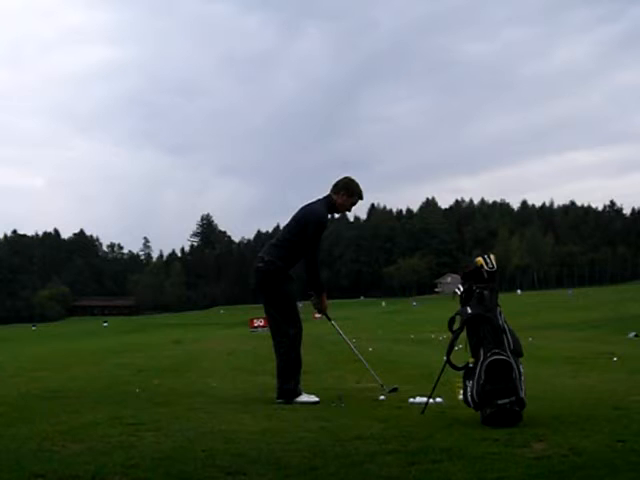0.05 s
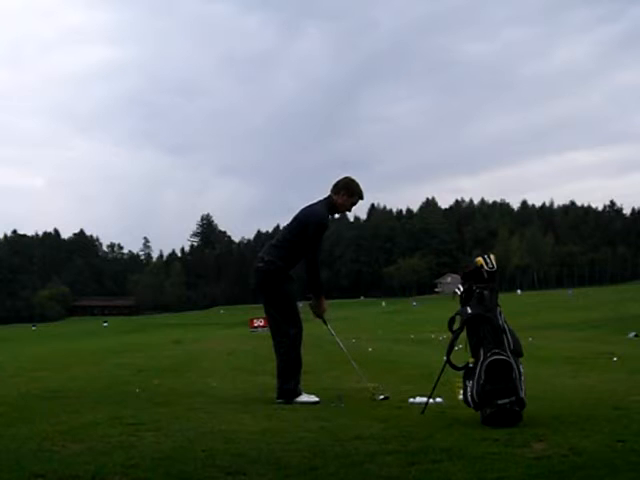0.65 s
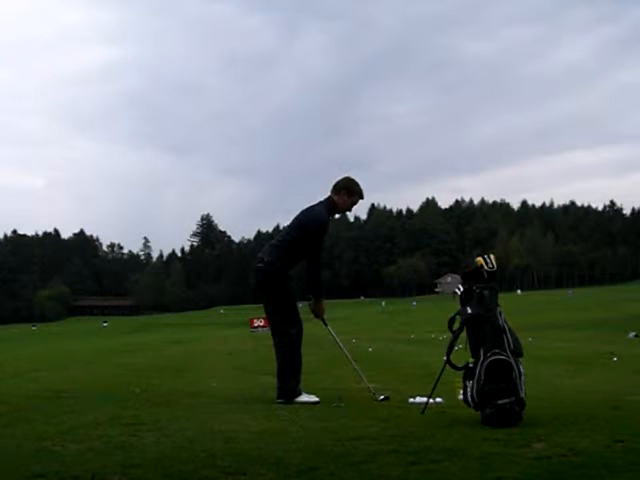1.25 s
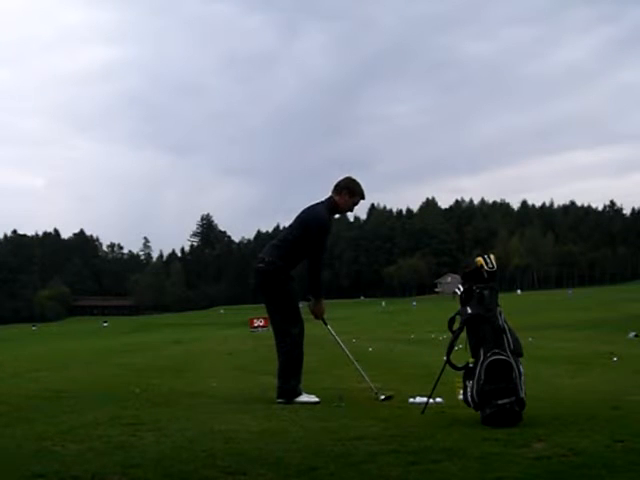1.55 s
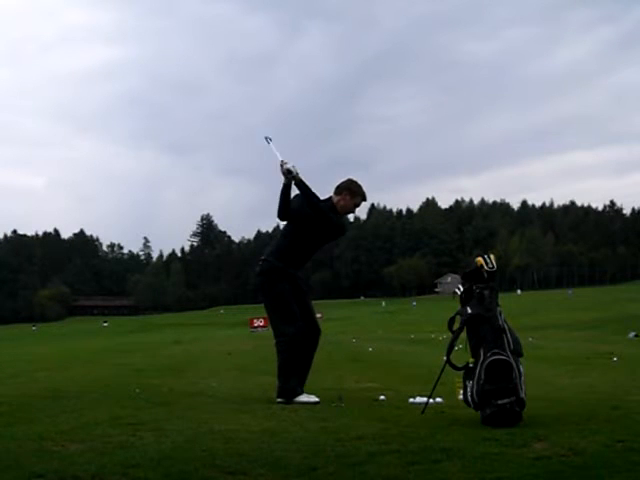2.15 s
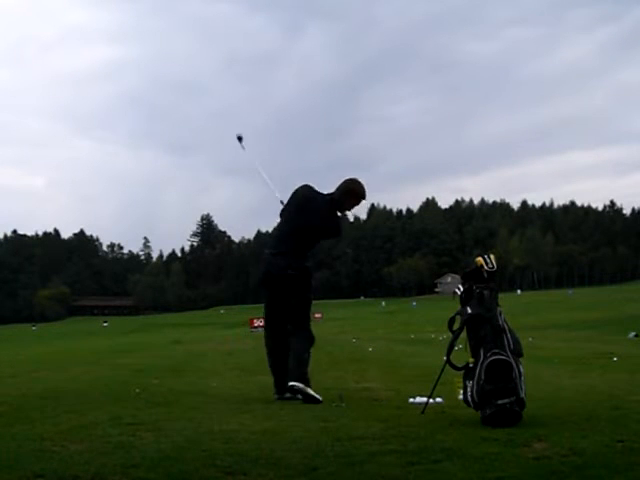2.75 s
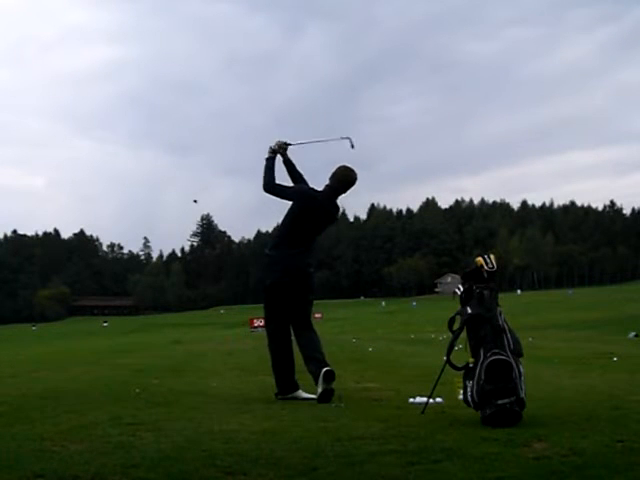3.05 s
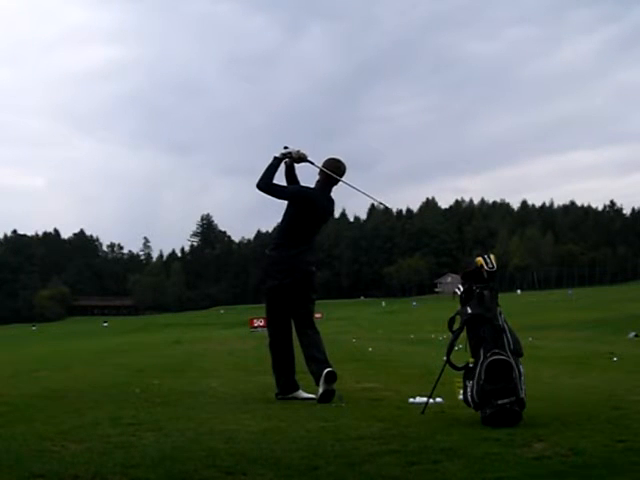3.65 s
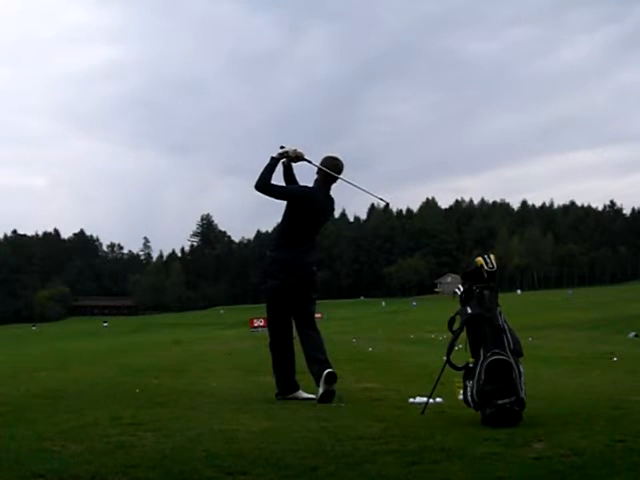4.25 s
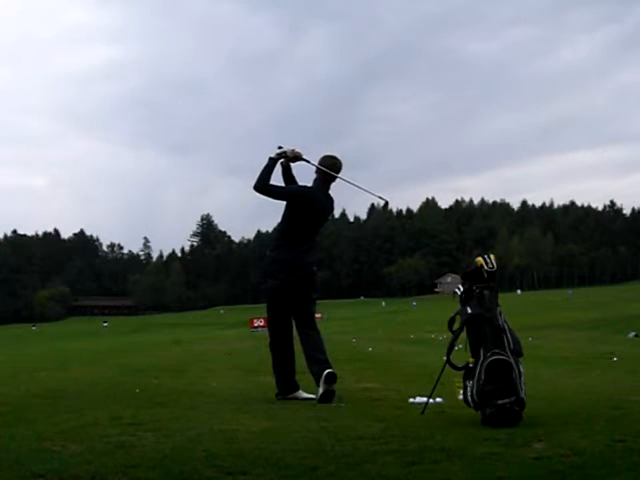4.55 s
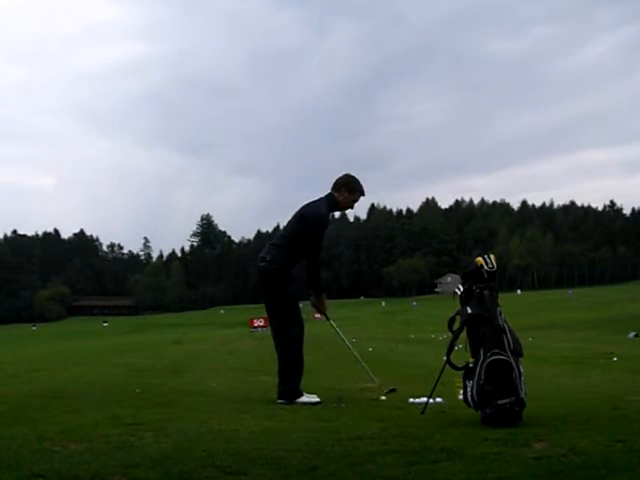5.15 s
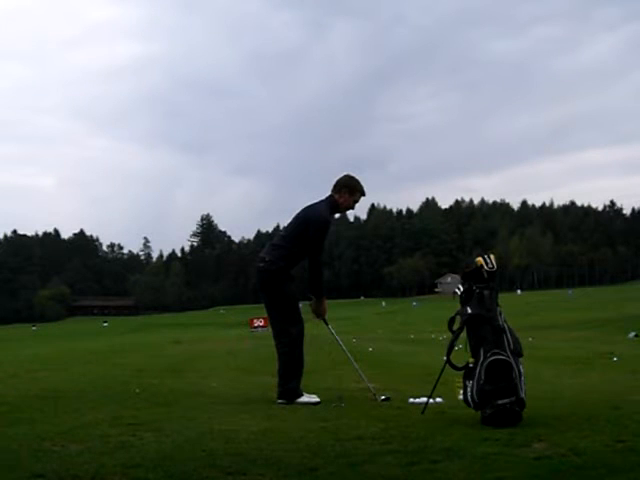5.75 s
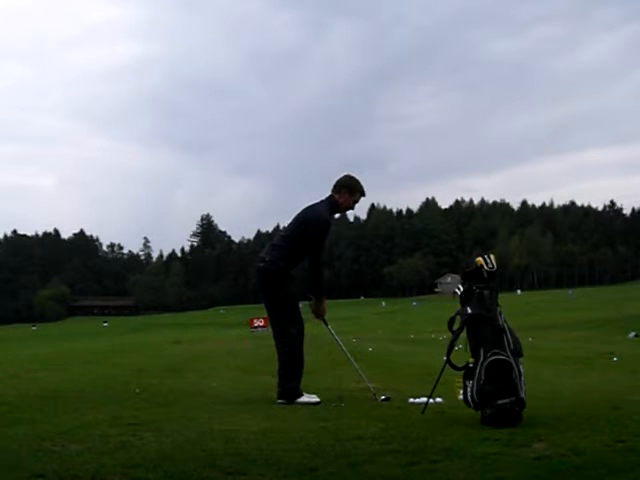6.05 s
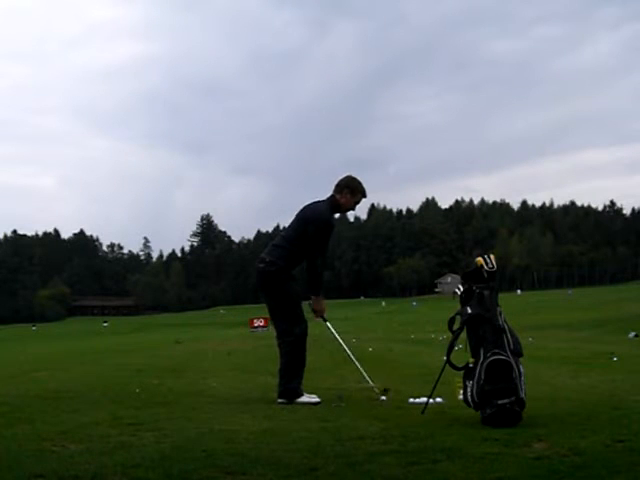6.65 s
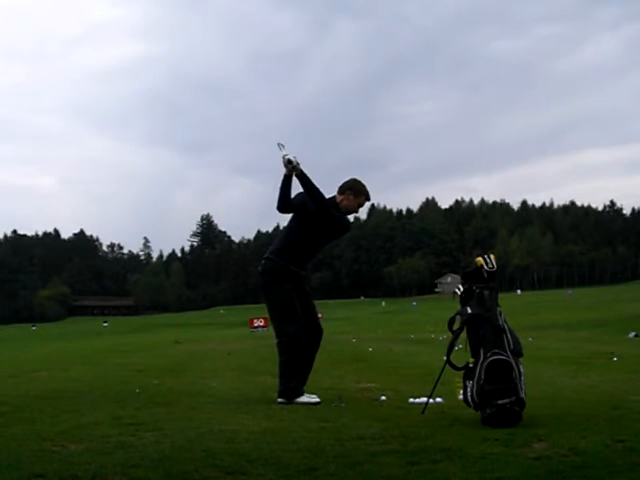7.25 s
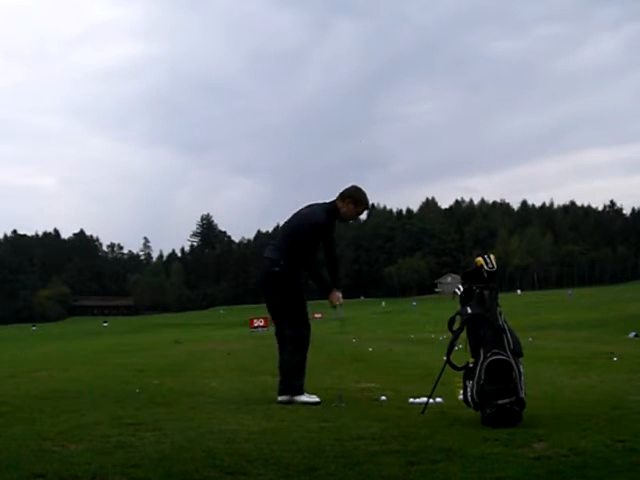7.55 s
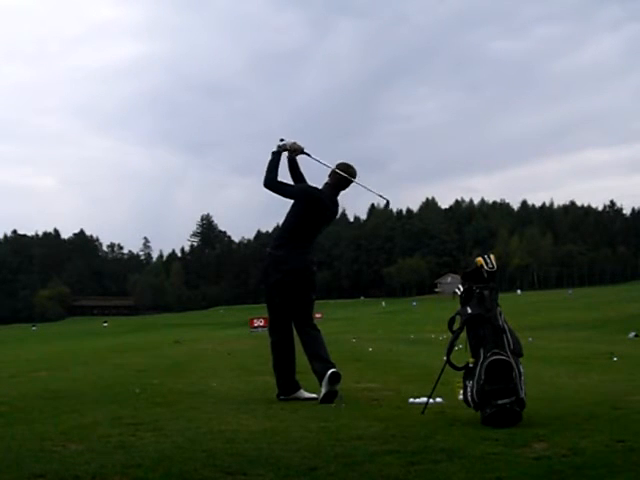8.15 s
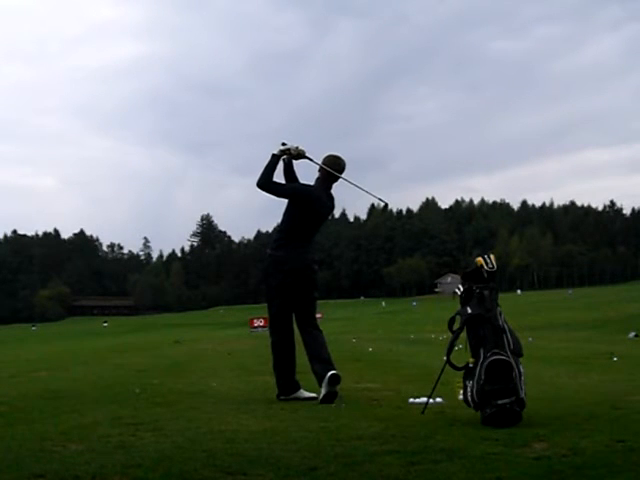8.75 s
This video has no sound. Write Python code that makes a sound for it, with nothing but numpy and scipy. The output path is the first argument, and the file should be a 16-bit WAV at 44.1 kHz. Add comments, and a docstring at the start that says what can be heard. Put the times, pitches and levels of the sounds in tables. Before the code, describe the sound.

Faint distant traffic rumbles beneath a soft hiss at a driving range. A few metres away, a golfer swings with a quick whoosh and strikes the ball, the hard crack scattering into brief echoes. Two light metallic clinks follow from further away. The rumble dies down, and after a pause a second, slightly louder shot cracks and echoes in the same way.

```python
"""On a driving range, two golf shots are hit a few metres away in the tee shelter.
Each time the club swishes through the air and cracks against the ball, and the shelter
scatters the crack into a wash of echoes. Another club clinks further off.
Distant traffic rumbles and fades under a steady hiss, a low hum and a few faint brushes and peeps."""
import sys
import numpy as np
from scipy import signal
from scipy.fft import rfft, irfft
from scipy.io import wavfile
from scipy.ndimage import uniform_filter1d

SR = 44100
rng = np.random.default_rng(int(sys.argv[2]) if len(sys.argv) > 2 else 0)


def persist_wave(psi):
    """Save psi, clipped to +-1, as 16-bit WAV."""
    counts = np.round(np.clip(psi, -1, 1) * 32767).astype(np.int16)
    wavfile.write(sys.argv[1], SR, np.atleast_2d(counts).T)


N = 396900

# one row a shot: t/s, knock/dB, crack/dB, turf thud/dB, echo/dB, swish/dB, whistle/dB,
# whistle lead/s, shaft tip/dB
SHOTS = [(2.6368, -4, -18, -26.5, -29, -44.5, -40, 0.0145, -53.5),
         (7.6542, -0.5, -18, -37, -28.5, -44.5, -35, 0.021, -57)]
# tones of club head and ball: f/Hz, level/dB, t60/s (the time to fade by 60 dB)
HEAD_TONES = [(370, -18, 0.024), (637, -9.5, 0.015), (797, -8.5, 0.0093), (1048, 3, 0.0065),
              (1410, -22, 0.0052)]
# the club rushes past on the way down and in the follow-through: t from impact/s, width/s, level/dB
STROKES = [(-.024, 0.025, -3.5), (.03, 0.021, 8)]
# tone colour of the rushing air (a colour sets the balance of low and high): f/Hz, level/dB
SWISH_COLOUR = [(100, -15), (300, -6), (560, 2), (800, -8.5), (1100, -2), (1500, -14), (2700, -18),
                (4500, -14.5), (8000, -20.5), (15000, -24)]
# whistles from swirls of air behind the tapering shaft: f/Hz, relative level/dB
WHISTLE_TONES = [(560, -5), (1060, -17), (2700, -33.5)]
# the thin end of the shaft sings on the way down: t before impact/s, length/s, f/Hz, width/Hz
TIP_SONG = (0.037, .022, 2700, 160)
# single bounces off nearby surfaces: delay/s, level/dB
REFLECTIONS = [(.0079, -13), (0.0199, -14.5), (0.049, -17)]
# colour of the echoes, one list a shot: f/Hz, level/dB
ECHO_COLOURS = [
    [(53, -42), (90, -5.5), (151, -18), (188, 8), (351, -7), (392, -1.5), (617, -6.5), (853, -4.5),
     (1600, -13.5), (2570, -7), (3400, -13), (5720, -13.5), (8810, -22), (10000, -18), (15800, -30)],
    [(53, -43), (90, -5), (238, -13), (309, -5.5), (383, -1.5), (591, -6), (799, -2.5), (1460, -8.5),
     (1600, -13), (2800, -12.5), (5130, -15), (5840, -10.5), (6650, -17), (14200, -26.5), (15800, -31)],
]
# peaks and dips the metal head leaves in the echoes: f/Hz, width/Hz, level/dB
HEAD_PEAKS = [(2800, 200, 3), (3780, 320, 4), (5220, 330, -6), (5790, 370, 1), (8900, 250, -7),
              (10200, 400, 2.5), (12000, 400, 2), (13050, 400, -4), (14050, 500, 4), (15200, 600, -5)]
# how long the echoes last at each pitch: f/Hz, t60/s
ECHO_DECAY = [(120, 0.061), (300, 0.6), (600, 0.69), (1200, 0.57), (3000, 0.46), (6000, 0.46),
              (12000, 0.33)]
# colour of the far echo from the trees: f/Hz, level/dB
TREE_COLOUR = [(100, -21), (300, -6), (600, 9), (1100, -5.5), (1700, -9.5), (5000, -16), (10000, -60)]
# small knocks of gear further off: t/s, tick/dB, ring/dB
CLINKS = [(2.511, -47, -90), (3.3613, -45, -53.5), (3.398, -43, -51)]
# colour of their tick: f/Hz, level/dB
TICK_COLOUR = [(300, -17), (1000, 6.5), (1500, 5), (2300, 6), (3600, -4.5), (5000, 6.5), (6000, -8),
               (7200, 2), (8500, -21), (12000, -21)]
# ring of a hollow metal club head, blurred by the shelter: f/Hz, width/Hz, level/dB, t60/s
METAL_TONES = [(2190, 140, -3.5, 0.36), (2750, 600, -7.5, .27), (4330, 200, -11, .25),
               (4740, 86, -10, 0.55), (4880, 70, -3.5, 0.51)]
# swells of traffic: loudest t/s, level/dB, width/s
TRAFFIC_SWELLS = [(.15, -53.5, 0.79), (1.3, -55, 0.45), (2.92, -52.5, 0.46), (4.3, -59.5, .48)]
# colour of distant traffic: f/Hz, level/dB
TRAFFIC_COLOUR = [(25, -14), (70, -6.5), (115, -2.5), (165, -7), (220, -7.5), (285, -5.5), (450, -14.5),
                  (700, -16.5), (950, -27), (2000, -40), (5000, -69)]
# pitches at which the air in the shelter booms: f/Hz, width/Hz, boost/dB
SHELTER_PEAKS = [(67, 16, 9.5), (111, 13, 6), (182.4, 11, 9.5), (220.8, 34, 12), (316, 30, 1),
                 (419, 68, 5.5), (545, 47, 7.5), (665, 70, 5.5)]
# low drones that stand out of the rumble: t/s, length/s, f/Hz, width/Hz, level/dB
DRONES = [(0.067, 0.74, 229, 8.2, -62.5), (.8, 0.91, 88, 55, -58.5), (1.24, 0.155, 547, 30, -61.5),
          (1.27, .18, 204, 47, -54.5), (1.55, 0.253, 147, 70, -58), (2.701, 2.3, 216, 23, -63),
          (4.033, 0.22, 317, 82, -64)]
# colour of the steady hiss: f/Hz, level/dB
HISS_COLOUR = [(15, -29), (32, -7.5), (60, -3.5), (88, -10), (113, -7.5), (176, -13), (320, -16.5),
               (570, -19), (713, -21), (1500, -24.5), (4370, -27.5), (13400, -30), (15800, -30.5)]
# hum of far machinery: f/Hz, level/dB
HUM_TONES = [(64.6, -66.5), (118.4, -70)]
# soft brushes as the golfer settles: t/s, length/s, level/dB
BRUSHES = [(0.724, .015, -65), (0.749, .038, -63.5)]
# thin, faint peeps far away: t/s, length/s, f/Hz, width/Hz, level/dB
PEEPS = [(.96, .14, 6500, 500, -69), (1.472, 0.16, 1044, 55, -74)]
# narrow dips in the microphone's treble: f/Hz, width/Hz, level/dB
MIC_DIPS = [(6560, 142, -22), (10980, 230, -7)]


def golf_shots():
    """Each shot is a swing, a hit, a few quick bounces of that sound and a wash of echoes."""
    out = np.zeros(N)
    tip_lead_s, *tip_tone = TIP_SONG
    for shot, colour in zip(SHOTS, ECHO_COLOURS):
        at, knock_db, crack_db, thud_db, echo_db, air_db, whistle_db, lead_s, tip_db = shot
        hit = impact(knock_db, crack_db, thud_db)
        add(out, at - 0.25, swish(air_db, whistle_db, lead_s))
        add(out, at - tip_lead_s, soft_note(*tip_tone, tip_db))
        add(out, at, hit)
        for delay, db in REFLECTIONS:
            add(out, at + delay, gain_of(db) * hit)
        add(out, at, gain_of(echo_db) * echoes(colour))
    return out


def impact(knock_db, crack_db, thud_db, contact_s=0.00074, crack_s=0.0012, thud_hz=190, thud_t60=0.041):
    """The club squeezes the ball for under a millisecond, cracks, and thuds through the turf."""
    t = seconds(0.1)
    squeeze = 1 - np.exp(-2 * (t / contact_s) ** 2)
    knock = gain_of(knock_db) * ring(HEAD_TONES, t) * squeeze
    burst = np.sin(np.pi * np.minimum(t / crack_s, 1))
    trail = gain_of(-8) * np.exp(-t / 0.0055)
    bright = noise([(800, -40), (2500, 3), (5000, 4.5), (13000, 0.5), (16000, 1.5), (18000, -24)], len(t))
    crack = gain_of(crack_db) * (burst + trail) * bright
    thud = gain_of(thud_db) * ring([(thud_hz, 0, thud_t60)], t)
    return knock + crack + thud


def swish(air_db, whistle_db, lead_s, whistle_s=0.0039, linger_db=-11, linger_s=0.016, slow_air_db=-20.5):
    """Air hisses round the club, and the shaft whistles just before the ball is hit."""
    t = seconds(0.5) - 0.25  # zero is the moment of impact
    rush = sum(gain_of(db) * np.exp(-((t - at) / width) ** 2) for at, width, db in STROKES)
    swing = (rush + gain_of(slow_air_db)) * signal.windows.tukey(len(t))
    wobbly_t = np.cumsum(1 + 0.058 * wobble(len(t), 200)) / SR  # makes the pitch waver
    whistle = unit_level(sum(gain_of(db) * np.sin(2 * np.pi * hz * wobbly_t) for hz, db in WHISTLE_TONES))
    # the whistle peaks as the shaft sweeps past, then lingers around the impact
    passing = np.exp(-((t + lead_s) / whistle_s) ** 2)
    linger = gain_of(linger_db) * np.exp(-(t / linger_s) ** 2)
    air = gain_of(air_db) * swing * noise(SWISH_COLOUR, len(t))
    return air + gain_of(whistle_db) * (passing + linger) * whistle


def echoes(colour, build_s=0.043, early_db=-4.5, onset_s=0.00086, trees_db=-25, trees_t60=2):
    """The shelter scatters the crack, middle pitches lasting longest; trees send back a dull echo."""
    t = seconds(1)
    hz, at, bands = signal.stft(noise(colour, len(t), HEAD_PEAKS), SR, nperseg=256)
    fade = gain_of(-60 * np.maximum(at - build_s, 0) / look_up(ECHO_DECAY, hz)[:, None])
    tail = signal.istft(bands * fade, SR, nperseg=256)[1][:len(t)]
    lumps_db = 1.3 * wobble(len(t), 60) * np.exp(-t / 0.2)  # early echoes are uneven
    build_db = early_db * np.maximum(1 - t / build_s, 0)
    shelter = tail * gain_of(build_db + lumps_db)
    trees = gain_of(trees_db - 60 * t / trees_t60) * noise(TREE_COLOUR, len(t))
    return (shelter + trees) * (1 - np.exp(-t / onset_s))


def clinks(tick_s=0.0043, scatter_db=-6, scatter_t60=0.69, build_s=0.009):
    """Knocked gear ticks; a firm knock also rings the metal and scatters round the shelter."""
    out, t = np.zeros(N), seconds(1)
    fade_in = 1 - np.exp(-t / build_s)
    for at, tick_db, ring_db in CLINKS:
        tick = gain_of(tick_db) * np.exp(-t / tick_s) * noise(TICK_COLOUR, len(t))
        metal = sum(gain_of(db - 60 * t / t60) * fuzzy_tone(hz, width, len(t))
                    for hz, width, db, t60 in METAL_TONES)
        scatter = gain_of(scatter_db - 60 * t / scatter_t60) * noise(TICK_COLOUR, len(t))
        add(out, at, tick + gain_of(ring_db) * (metal + scatter) * fade_in)
    return out


def traffic(steepness=0.95, steady_db=-72.5):
    """Rumble from a far road comes and goes in swells, and booms in the shelter."""
    t = np.arange(N) / SR
    power = sum((gain_of(db) / (1 + ((t - at) / width) ** 2) ** steepness) ** 2
                for at, db, width in TRAFFIC_SWELLS)
    loudness = np.sqrt(power + gain_of(steady_db) ** 2)
    out = loudness * noise(TRAFFIC_COLOUR, N, SHELTER_PEAKS)
    for at, *drone in DRONES:
        add(out, at, soft_note(*drone))
    return out


def background(hiss_db=-59):
    """A steady hiss and the wavering hum of far machinery, with a few soft brushes and peeps."""
    out = gain_of(hiss_db) * noise(HISS_COLOUR, N)
    out += sum(gain_of(db) * fuzzy_tone(hz, width_hz=12, size=N) for hz, db in HUM_TONES)
    for at, length, db in BRUSHES:
        add(out, at, soft_note(length, hz=1210, width_hz=980, db=db))
    for at, *peep in PEEPS:
        add(out, at, soft_note(*peep))
    return out


def ring(tones, t):
    """Pure tones that start together and die away, as in a struck object."""
    return sum(gain_of(db - 60 * t / t60) * np.sin(2 * np.pi * hz * t) for hz, db, t60 in tones)


def soft_note(length, hz, width_hz, db):
    """A fuzzy tone that fades in, holds and fades out."""
    size = int(length * SR)
    return gain_of(db) * fuzzy_tone(hz, width_hz, size) * signal.windows.tukey(size)


def fuzzy_tone(hz, width_hz, size):
    """Noise at level 1, gathered round one pitch; a wider band sounds more like a hiss."""
    f = np.fft.rfftfreq(size, 1 / SR)
    spectrum = rfft(rng.standard_normal(size)) / (1 + (2 * (f - hz) / width_hz) ** 2)
    return unit_level(irfft(spectrum, size))


def noise(colour, size, peaks=()):
    """Noise at level 1, with the given tone colour and peaks."""
    hz = np.fft.rfftfreq(size, 1 / SR)
    shape = gain_of(look_up(colour, hz) + peaks_db(peaks, hz))
    return unit_level(irfft(rfft(rng.standard_normal(size)) * shape, size))


def wobble(size, smooth_samples):
    """A smoothed random wiggle at level 1."""
    return unit_level(uniform_filter1d(rng.standard_normal(size), size=smooth_samples))


def peaks_db(peaks, hz):
    """Adds up rounded peaks and dips, in dB, at each frequency."""
    return sum(db / (1 + (2 * (hz - centre) / width) ** 2) for centre, width, db in peaks)


def look_up(points, hz):
    """Reads between a table's rows along a pitch (log-frequency) scale."""
    f, value = np.transpose(points)
    return np.interp(np.log(hz + 1), np.log(f + 1), value)


def gain_of(db):
    """Turns decibels into a number to multiply by."""
    return 10 ** (np.asarray(db) / 20)


def unit_level(x):
    """Scales a signal so its average (rms) level is 1."""
    return x / np.sqrt(np.mean(x ** 2) + 1e-20)


def seconds(length):
    """The time of each sample, in seconds."""
    return np.arange(int(length * SR)) / SR


def add(mix, start_s, sound):
    """Mixes a sound in at the given time."""
    part = mix[round(start_s * SR):][:len(sound)]
    part += sound[:len(part)]


def scene():
    """The whole range, in one channel."""
    return (golf_shots() + clinks() + traffic() + background())[None]


def record(dry, silent_s=0.071, top_hz=15950):
    """The microphone dips two narrow bands; the first instant is silent and the top treble is cut."""
    response = gain_of(peaks_db(MIC_DIPS, np.fft.rfftfreq(N, 1 / SR)))
    heard = irfft(rfft(dry) * response, N)
    heard *= np.arange(N) / SR > silent_s
    treble_cut = signal.firwin(511, top_hz, window=("kaiser", 9), fs=SR)
    return signal.oaconvolve(heard, treble_cut[None], "same")


dry = scene()
out = record(dry)
persist_wave(out)
```